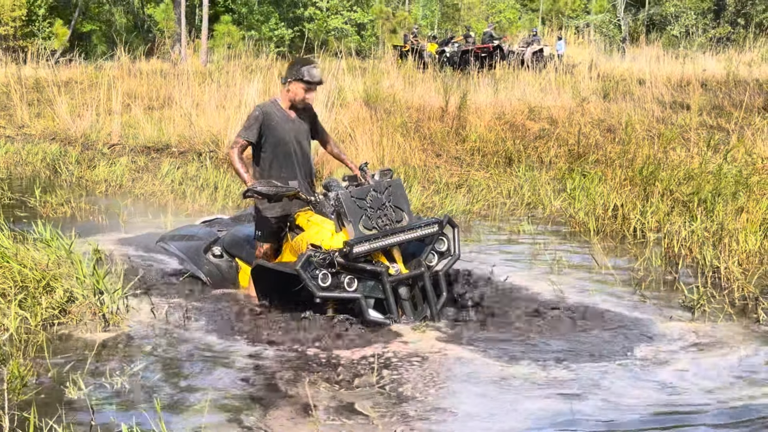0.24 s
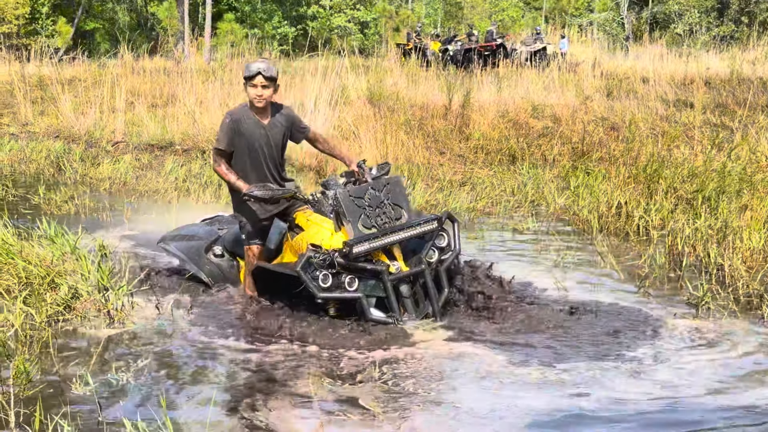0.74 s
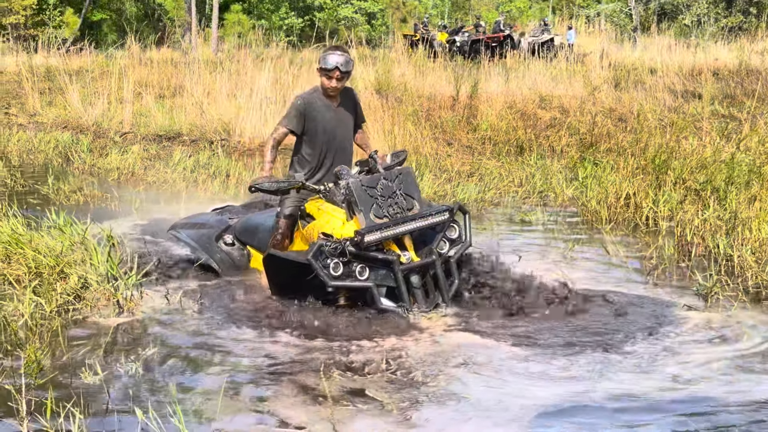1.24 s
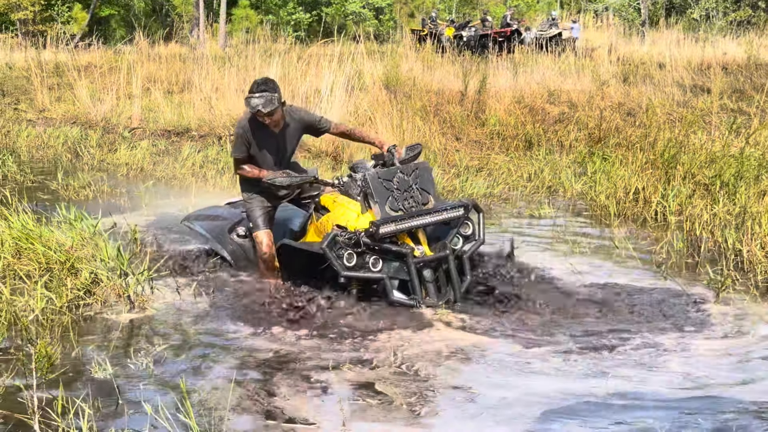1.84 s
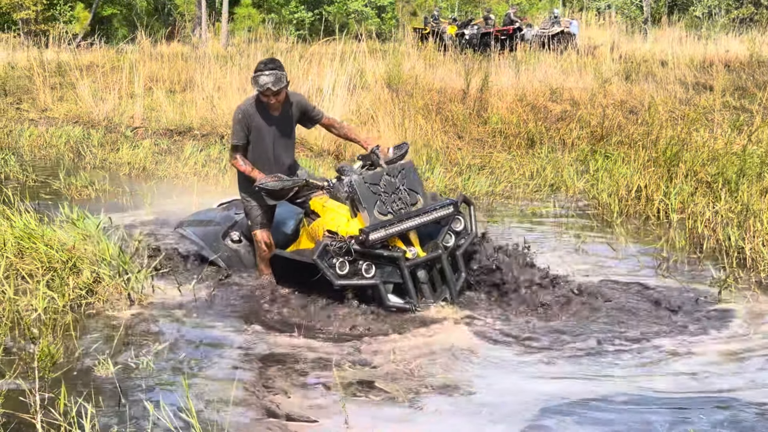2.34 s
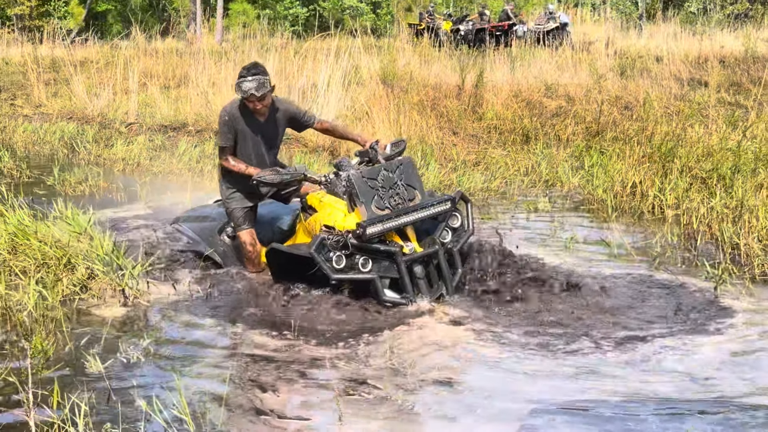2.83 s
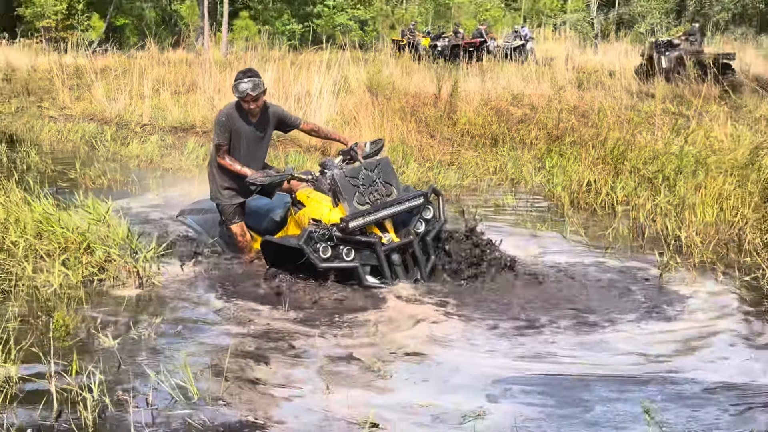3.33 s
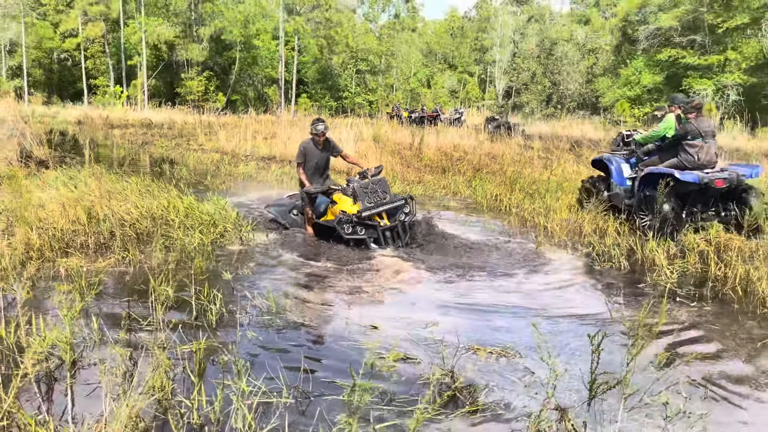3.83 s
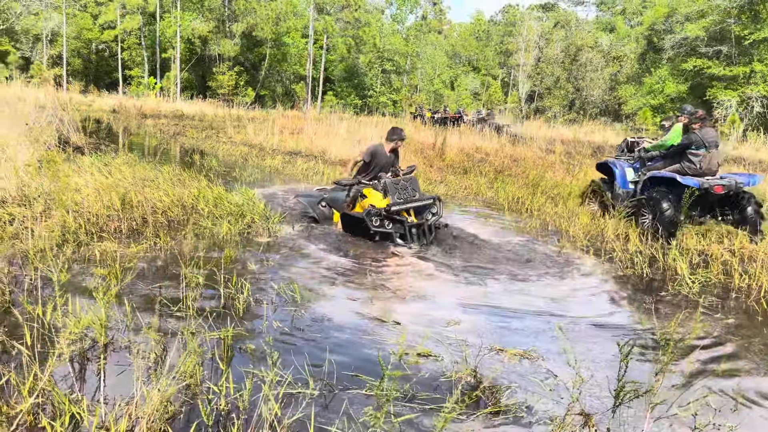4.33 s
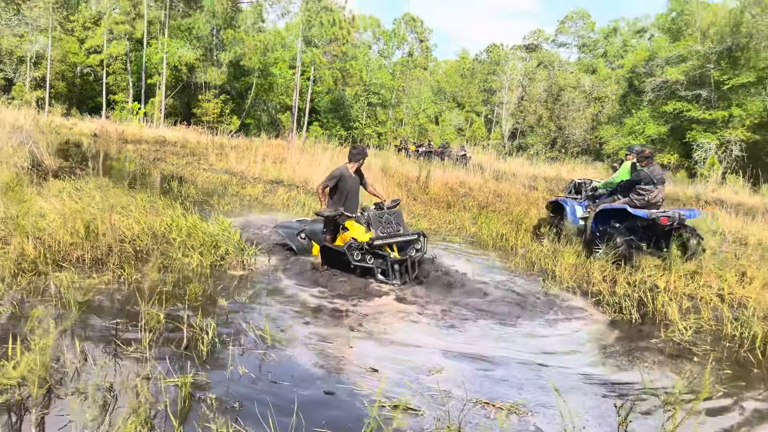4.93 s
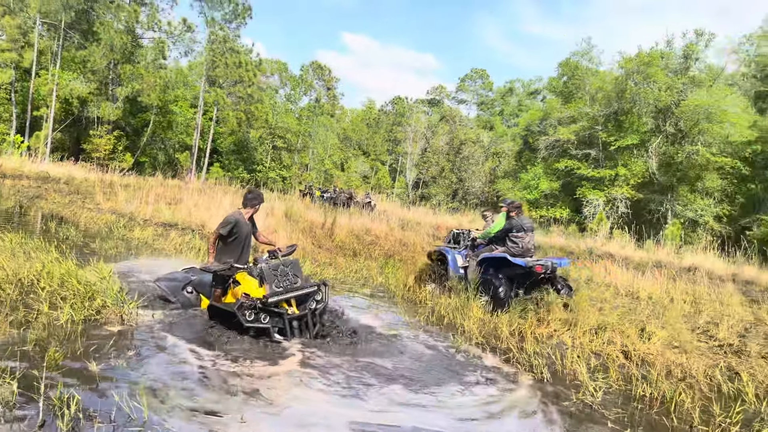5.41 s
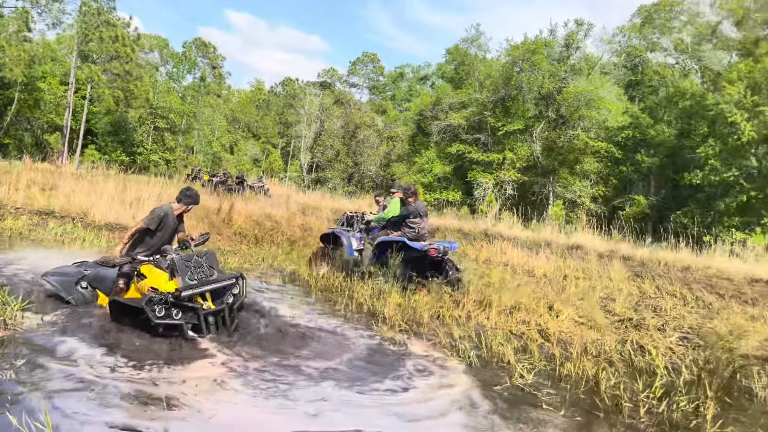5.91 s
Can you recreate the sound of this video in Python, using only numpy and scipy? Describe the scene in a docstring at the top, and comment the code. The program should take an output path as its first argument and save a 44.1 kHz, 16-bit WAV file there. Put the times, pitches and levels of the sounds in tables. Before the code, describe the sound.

Rough twin-cylinder quad revs in short bursts in a mud hole, wet churning underneath, another quad passing through grass in an open field.

```python
"""Hard exhaust barks in quick bursts: a V-twin quad, deep in a mud hole in an open field, is blipped again and again.
Each blip, a quick stab or one whose effort builds up, fires two uneven cylinders hard; then the engine coasts down.
Its wheels churn muddy water: shaped noise for churn, spray and slosh, with single blobs and clods.
Farther off a second quad drones in even pulses and fades; close by and to the side a third ticks over.
Tyres brush past through grass, a squeak falls once, and the field returns a faint, dull tail."""
import sys
import numpy as np
from scipy import signal
from scipy.fft import rfft, irfft
from scipy.io import wavfile

SR = 44100
rng = np.random.default_rng(int(sys.argv[2]) if len(sys.argv) > 2 else 0)


def generate_wav(signal):
    """Clip the signal to [-1, 1] and save it as 16-bit WAV at the path in sys.argv[1]."""
    frames = np.transpose(np.atleast_2d(signal))
    scaled = np.clip(frames, -1, 1) * 32767
    pcm = np.round(scaled).astype(np.int16)
    wavfile.write(sys.argv[1], SR, pcm)


N = 271813
TIME = np.arange(N) / SR

# All colours are relative spectra. Each row: frequency in Hz, gain in dB.
# Far off: the droning quad.
FAR_COLOUR = [(60, -40), (150, 2), (240, 15), (330, -0.5), (450, 2.5), (520, -2), (750, -11.5),
              (1200, -39.5), (2000, -27), (3000, -29.5), (5000, -52), (16000, -71)]
# On the ground: tyres in grass, wheels churning, fine spray, waves sloshing.
GRASS_COLOUR = [(200, -12), (950, 12), (1400, -9), (2500, -22), (3750, 0), (5600, -11), (7000, -22),
                (16000, -27)]
CHURN_COLOUR = [(40, 13.5), (150, -5), (400, 10), (800, 12.5), (1400, 1.5), (2000, -1.5), (3000, -5),
                (4200, -8.5), (6000, -56), (16000, -18)]
SPRAY_COLOUR = [(1500, -14), (3000, 6.5), (4500, -4.5), (6000, -1), (8200, -2), (9500, -28), (15000, -33)]
SLOSH_COLOUR = [(100, -8), (400, 12), (800, 4.5), (1100, 1), (1450, 1.5), (2200, -9.5), (2900, -27),
                (16000, -43)]
# Close by: valve ticks, a colour the slapping clods share.
TICK_COLOUR = [(500, 25.5), (1500, 7), (3000, 6.5), (4500, 9.5), (6500, 3.5), (8500, 9), (11000, 11),
               (14300, 8.5), (16000, 9.5)]
# In the mud hole: the thud of every firing, the bark of hard ones, gas growling in the pipe and rasping at its mouth.
THUD_COLOUR = [(25, -62), (42, -15.5), (55, -4.5), (80, 2), (105, 0), (135, 0), (165, -7), (200, -5.5),
               (260, -18), (380, -19.5), (550, -40.5), (1000, -48), (2500, -60), (16000, -107)]
BARK_COLOUR = [(40, -36.5), (90, -11), (125, -0.5), (180, 6.5), (270, -9.5), (345, -3), (430, -17.5),
               (495, -20), (570, -16), (680, -27), (820, -23.5), (1250, -42), (2500, -72.5), (16000, -108)]
GROWL_COLOUR = [(60, -21), (150, 5), (320, 5), (430, 0.5), (500, -15), (570, -4.5), (680, -19), (800, -8),
                (1050, -18.5), (1400, -23.5), (3000, -41), (16000, -74)]
RASP_COLOUR = [(80, -26), (250, -30), (450, 16.5), (850, 6), (1300, -4.5), (2500, -0.5), (5000, -11),
               (10000, -19.5), (16000, -9)]

# The farther quad. Each row: time in seconds, firings per second.
FAR_SPEED = [(0.0, 40.2), (1.34, 46.2), (2.51, 44.7), (2.69, 45.8), (3.31, 43.8), (3.7, 40.5)]
# The quad ticking over close by. Each row: time in seconds, strong ticks per second, level in dB before tick_db.
TICKING = [(0.0, 16.9, -58), (0.36, 17.3, -59), (0.86, 22.2, -55), (1.17, 23.8, -57), (1.66, 23.8, -60),
           (2.33, 23.9, -59), (3.29, 22.4, -61), (3.74, 19.8, -62), (4.03, 20.9, -63), (4.32, 22.6, -61),
           (4.65, 21.7, -62), (5.2, 16.6, -63), (5.58, 16.0, -62), (6.16, 19.2, -61)]
# Muddy water at the wheels. Each row: time in seconds, level in dB before the gain of each layer.
CHURN = [(0.0, -46.5), (0.93, -46.5), (3.19, -51.5), (4.1, -58.5), (4.63, -51.5), (5.68, -58),
         (6.16, -48.5)]
# Fine spray above the wheels. Each row: time in seconds, level in dB before spray_db.
SPRAY = [(0.0, -49), (0.98, -65), (1.78, -94), (2.43, -78), (3.24, -52.5), (3.93, -60.5), (6.16, -51)]
# Clods of mud slapping down. Each row: time in seconds, relative strength in dB.
SLAPS = [(2.4849, -36), (4.7147, -34), (5.61, -28)]
# A falling squeak, perhaps the drive belt. One row: start in seconds, length in seconds, first Hz, last Hz,
# peak level in dB.
SQUEAK = (3.07, .15, 1560, 1330, -42)
# Quick stabs of the throttle, wide open at once. Each row: first firing in seconds, effort in dB.
STABS = [(.956, 3), (1.206, 2), (1.487, 2), (1.773, 1.5), (2.023, 2), (2.270, 1.5), (2.522, 1),
         (2.806, 2.5), (3.055, 2), (3.268, 2), (3.517, 1.5), (5.351, 3.5), (6.138, -0.5)]
# Blips of varied length, .04 to .19 s, the effort building up; the one at 0 is the end of a quick stab.
# Each row: first firing in seconds, length in seconds, top speed in cycles per second, top effort in dB.
BUILDING_BLIPS = [(0, .04, 29, -3), (.42, .09, 24.5, -1.5), (.586, .175, 29.8, 1.8),
                  (4.342, .192, 27.5, .8), (4.728, .046, 26, -1), (5.04, .18, 27.7, 0),
                  (5.776, .14, 31.3, 5)]
# The microphone pair. Each row: time in seconds, zoom from 0 to 1 that narrows the pair to one beam,
# milliseconds by which the stuck quad reaches the right microphone later.
MICROPHONES = [(0, 0.69, 0.47), (3.5, 0.77, 0.3), (3.9, 0.32, 0.087), (6.16, 0.22, .2)]

# tyres through the grass: nearest at (s), half duration (s), peak of the swell (dB)
PASS_S, PASS_WIDTH_S, PASS_DB = 3.93, 0.45, -48
# the farther quad's pulses hold this level (dB) until it drives off (s), then fade (dB per s)
FAR_DB, FAR_LEAVES_S, FAR_FADE_DB_PER_S = -28.5, 2.37, 4
# the slosh (dB at the start) grows as the waves spread into the grass (dB per s)
SLOSH_DB, SLOSH_GROWTH_DB_PER_S = -48.5, 1.5
# cycles per s towards which the shut engine falls, before the coast is trimmed to whole cycles; time constant (s)
IDLE, COAST_S = 16.8, .3
# share of a cycle by which the second cylinder follows the first
SECOND_CYLINDER = .59
# a stab: length (s), first and last speed (cycles per s), stumble of its fourth firing (dB)
STAB_S, STAB_FROM, STAB_TO, STUMBLE_DB = .075, 24.6, 32.4, -4
# a building blip: first speed (cycles per s), first effort (dB), power of the curve on which effort levels off
BUILD_FROM, BUILD_START_DB, BUILD_EASE = 21.5, -6, 2.9
# time constant of the throttle closing (s)
SHUT_S = 0.0049
# gas strength: dB for each dB of a blip's last effort relative to RASP_FROM_DB
RASP_PER_DB, RASP_FROM_DB = 1.04, 2.2
# the low thud (dB) weakens below THUD_FULL cycles per s, by so many dB for each cycle per s
THUD_DB, THUD_FULL, THUD_SAG_DB = -19.5, 21.7, 0.87
# late on, each firing rings the pipe: from (s), pitch (Hz), decay (s), gain (dB)
RING_FROM_S, RING_HZ, RING_S, RING_DB = 4.7, 201, 0.029, -26
# upper band limit (Hz)
EDGE_HZ = 15500


def amp(db):
    """Decibels to gain."""
    return 10 ** (np.asarray(db) / 20)


def unit(x):
    """Scales to rms 1."""
    return x / np.sqrt(np.mean(x ** 2) + 1e-20)


def curves(rows):
    """Each column after the time in a table, joined by straight lines sample by sample."""
    s, *columns = np.transpose(rows)
    return [np.interp(TIME, s, c) for c in columns]


def read(points, hz):
    """A spectrum joined by straight lines on a log-frequency axis."""
    f, value = np.transpose(points)
    return np.interp(np.log(hz + 1), np.log(f + 1), value)


def drift(rate_hz):
    """Random wandering of rms 1, mostly slower than rate_hz."""
    spectrum = rfft(rng.standard_normal(N))
    slow = spectrum / (1 + (np.fft.rfftfreq(N, 1 / SR) / rate_hz) ** 4)
    return unit(irfft(slow, N))


def colour(x, points, sweep_s=0., sweep_hz=200., size=4096):
    """Causal filter of the given spectrum; below sweep_hz it lags by up to sweep_s, so a pulse chirps down."""
    hz = np.fft.fftfreq(size, 1 / SR)
    log_gain = np.log(amp(read(points, abs(hz))))
    # the phase whose slope is the lag, brought to zero at the top of the band
    bend = 1 - np.exp(-abs(hz) / sweep_hz) - abs(hz) / (SR / 2)
    lag = 2 * np.pi * np.sign(hz) * sweep_s * sweep_hz * bend
    minimum_phase = np.conj(signal.hilbert(log_gain))
    response = np.fft.ifft(np.exp(minimum_phase - 1j * lag)).real
    return signal.oaconvolve(x, response)[:N]


def beats(turns):
    """A click each time the turn count passes a whole number."""
    return np.diff(np.floor(turns), prepend=-1).clip(0, 1)


def fade(clicks, decay_s):
    """Each click becomes a dying envelope."""
    return signal.lfilter([1], [1, -np.exp(-1 / (decay_s * SR))], clicks)


def later(x, ms):
    """Delays by a time that may drift."""
    return np.interp(TIME - ms / 1000, TIME, x)


def hiss(envelope, points):
    """Coloured noise of rms 1 under an envelope."""
    return unit(colour(envelope * rng.standard_normal(N), points))


def wide_hiss(envelope, points):
    """The same from all around: unrelated at the two microphones."""
    return np.array([hiss(envelope, points), hiss(envelope, points)])


def field(x, t60=0.19, size=16000):
    """Grass and the tree line scatter back a dull tail of sparse, dying reflections."""
    sparse = rng.standard_normal((2, size)) * (rng.random((2, size)) < .03)
    taps = sparse * amp(-60 * TIME[:size] / t60)
    taps /= np.linalg.norm(taps, axis=1, keepdims=True)
    dull = signal.butter(1, [350, 3000], "bandpass", fs=SR, output="sos")
    return signal.oaconvolve(x, signal.sosfilt(dull, taps), axes=1)[:, :N]


def far_quad(puff_s=0.014, tear_db=-23.0):
    """Farther off, a single cylinder gives even pulses, each with a puff of gas and a tearing edge."""
    firings = beats(np.cumsum(curves(FAR_SPEED)[0]) / SR) * amp(.8 * drift(30))
    level = amp(FAR_DB - FAR_FADE_DB_PER_S * np.maximum(TIME - FAR_LEAVES_S, 0))
    puff = fade(fade(firings, puff_s), 0.00055)
    pulses = unit(colour(firings, FAR_COLOUR, 0.0059, 1467.0))
    gas = amp(-12) * wide_hiss(puff, FAR_COLOUR)
    # scaled by the level here and again below, the tear dies away faster than the pulses
    tear = amp(tear_db) * level / level.max() * hiss(puff, SPRAY_COLOUR)
    return level * (pulses + gas + tear)


def grass():
    """A swish of noise that swells and fades as the tyres go by."""
    swell = amp(PASS_DB) / (1 + ((TIME - PASS_S) / PASS_WIDTH_S) ** 2)
    return swell * wide_hiss(amp(1.6 * drift(80)), GRASS_COLOUR)


def near_quad(tick_db=12.5, second_tick_db=-22.0, tick_s=0.012, whirr_db=1.5):
    """Close by, valve gear ticks strongly once a cycle and weakly in between, over a steady whirr."""
    rate, level_db = curves(TICKING)
    turns = np.cumsum(rate) / SR
    ticks = beats(turns) + amp(second_tick_db) * beats(turns - .5)
    ticking = unit(fade(fade(ticks * amp(1.2 * drift(32)), tick_s), .0032))
    sound = amp(level_db + tick_db) * hiss(ticking + amp(whirr_db), TICK_COLOUR)
    # from far to the side: the right microphone gets it 14 samples early and in opposite phase
    return np.array([np.roll(sound, 14), -sound])


def water(churn_db=6.5, spray_db=-3.0, lumps_db=2.5, drops_db=2.0, slop_db=0.5, slap_db=-62.0):
    """Lumpy churning at the wheels, finer spray above it, waves sloshing into the grass, a few falling clods."""
    churn = amp(curves(CHURN)[0] + churn_db)
    spray = amp(curves(SPRAY)[0] + spray_db)
    slosh = amp(SLOSH_DB + SLOSH_GROWTH_DB_PER_S * TIME)
    out = churn * wide_hiss(amp(lumps_db * drift(40)), CHURN_COLOUR)
    out += spray * wide_hiss(amp(drops_db * drift(250)), SPRAY_COLOUR)
    out += slosh * wide_hiss(amp(slop_db * drift(60)), SLOSH_COLOUR)
    clods = np.zeros(N)
    for s, db in SLAPS:
        clods[int(s * SR)] = amp(db)
    slaps = fade(fade(clods, 0.016), 0.0015)
    return out + amp(slap_db) * wide_hiss(slaps, TICK_COLOUR)


def spatter(per_s=45, spatter_db=2.5):
    """Single blobs of mud land at random, most small and a few large, their level following the churning."""
    sizes = amp(4 * np.minimum(rng.exponential(1, N), 3))
    landings = sizes * (rng.random(N) < per_s / SR)
    blobs = fade(fade(landings, .005), .0008)
    return amp(curves(CHURN)[0] + spatter_db) * wide_hiss(blobs, CHURN_COLOUR)


def squeak(s, length, first_hz, last_hz, db, waver=0.018):
    """An unsteady tone that drops quickly and settles."""
    u = np.clip((TIME - s) / length, 0, 1)
    glide = last_hz + (first_hz - last_hz) * (1 - u) ** 2
    hz = glide * (1 + waver * drift(120))
    return amp(db) * np.sin(np.pi * u) * np.sin(2 * np.pi * np.cumsum(hz) / SR)


def stab(s, effort_db):
    """Full effort at once, but for a stumble in the second cycle; gives start, speed, effort dB."""
    speed = np.linspace(STAB_FROM, STAB_TO, int(STAB_S * SR))
    stumbles = abs(np.cumsum(speed) / SR - 1 - SECOND_CYLINDER) < 1 / 4
    return s, speed, effort_db + STUMBLE_DB * stumbles


def building_blip(s, length, top, effort_db):
    """Speed climbs steadily while the effort builds and levels off; gives start, speed, effort dB."""
    left = np.linspace(1, 0, int(length * SR))
    speed = top + (BUILD_FROM - top) * left
    return s, speed, effort_db + (BUILD_START_DB - effort_db) * left ** BUILD_EASE


def crank():
    """The engine speeds up in each blip and coasts after it; gives turns, speed, throttle effort and rasp."""
    blips = [stab(*row) for row in STABS] + [building_blip(*row) for row in BUILDING_BLIPS]
    blips.sort(key=lambda blip: blip[0])
    starts = [max(int(blip[0] * SR), 0) for blip in blips]
    ends = starts[1:] + [N + SR]
    speed, effort, rasp = np.zeros((3, N + SR))
    for at, end, (s, climb, effort_db) in zip(starts, ends, blips):
        t = TIME[:end - at - len(climb)]
        coast = IDLE + (climb[-1] - IDLE) * np.exp(-t / COAST_S)
        # the coast ends on a whole cycle, so every blip opens on a firing of the first cylinder
        cycles = (climb.sum() + coast.sum()) / SR
        coast = coast * (np.round(cycles) * SR - climb.sum()) / coast.sum()
        closing = amp(effort_db[-1]) * np.exp(-t / SHUT_S)
        speed[at:end] = np.concatenate([climb, coast])
        effort[at:end] = np.concatenate([amp(effort_db), closing])
        rasp[at:end] = amp(RASP_PER_DB * (effort_db[-1] - RASP_FROM_DB))
    # a hair under whole turns, so that rounding does not shift a firing
    turns = np.cumsum(speed[:N]) / SR - 1e-6
    return turns, speed[:N], effort[:N], rasp[:N]


def stuck_quad(bark_db=-19.5, growl_db=-25.5, rasp_db=-44.5, second_db=-1.0, sweep_s=.013, sweep_hz=180.2):
    """Two cylinders fire at uneven spacing into a half-drowned exhaust, whose low notes leave last."""
    turns, speed, effort, rasp = crank()
    firings = beats(turns) + amp(second_db) * beats(turns - SECOND_CYLINDER)
    firings = firings * amp(1.1 * drift(40))
    level = amp(THUD_DB - THUD_SAG_DB * np.maximum(THUD_FULL - speed, 0))
    # the charge burns unevenly, and the thud sputters
    sputter = amp(1.8 * drift(18))
    thud = level * unit(colour(firings * sputter, THUD_COLOUR, sweep_s, sweep_hz))
    hard = firings * effort
    bark = amp(bark_db) * unit(colour(hard, BARK_COLOUR, sweep_s, sweep_hz))
    # turbulent gas follows each hard firing: it growls in the pipe and rasps at its mouth
    puff = fade(fade(hard * rasp, 0.011), 0.0022)
    growl = amp(growl_db) * hiss(puff, GROWL_COLOUR)
    mouth = amp(rasp_db) * hiss(puff * rasp, RASP_COLOUR)
    # every firing bubbles up through the water
    burble = amp(-27) * hiss(fade(firings * level, .025), THUD_COLOUR)
    note = np.exp(-TIME[:SR] / RING_S) * np.cos(2 * np.pi * RING_HZ * TIME[:SR])
    ring = amp(RING_DB) * signal.oaconvolve(firings * (TIME > RING_FROM_S), note)[:N]
    pipe = thud + bark + growl + mouth + burble + ring
    right_delay_ms = curves(MICROPHONES)[1]
    return np.array([pipe, later(pipe, right_delay_ms)])


def scene():
    """Three quads, the water and the grass in the open field, which echoes the stuck and the farther quad."""
    engines = far_quad() + stuck_quad()
    echo = amp(-10) * field(engines)
    return engines + echo + grass() + near_quad() + water() + spatter() + squeak(*SQUEAK)


def record(dry, ceiling=0.72):
    """Zoom draws the pair towards one beam below 9 kHz; peaks are rounded off; then the band limit."""
    left, right = dry
    apart = signal.oaconvolve(left - right, signal.firwin(255, 9000, fs=SR), "same")
    zoom = np.clip(curves(MICROPHONES)[0], 0, 1)
    pair = np.array([left, right + zoom * apart])
    rounded = pair / (1 + (pair / ceiling) ** 4) ** (1 / 4)
    # very short fades at both ends
    rounded = rounded * signal.windows.tukey(N, .002)
    band = signal.firwin(511, EDGE_HZ, window=("kaiser", 9), fs=SR)
    return signal.oaconvolve(rounded, band[None], "same", axes=1)


dry = scene()
out = record(dry)
generate_wav(out)
```